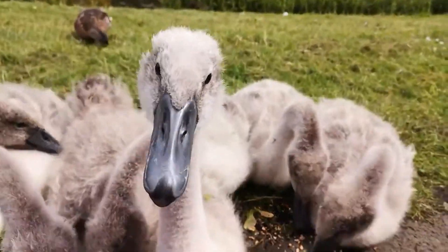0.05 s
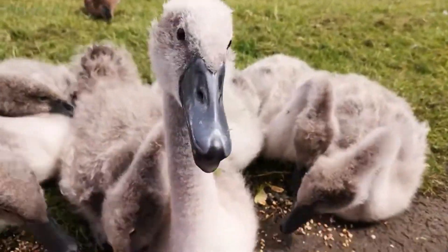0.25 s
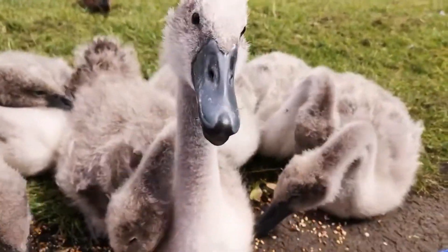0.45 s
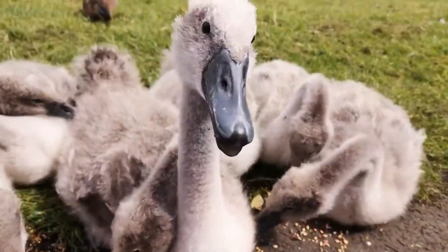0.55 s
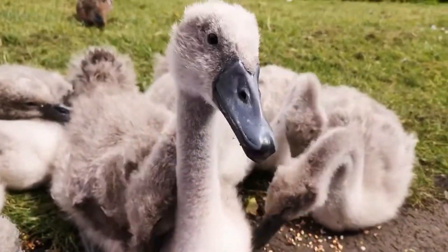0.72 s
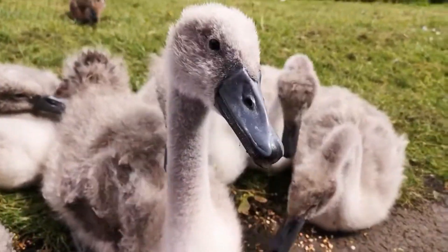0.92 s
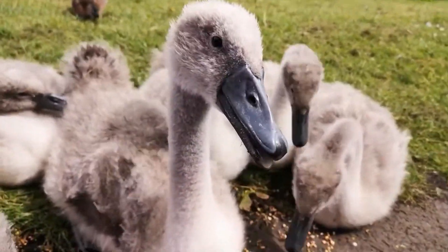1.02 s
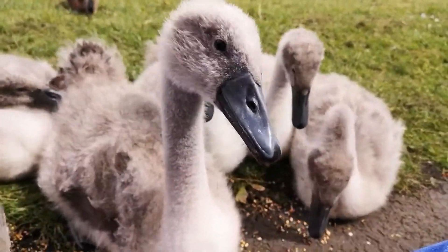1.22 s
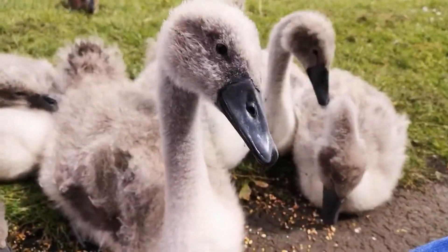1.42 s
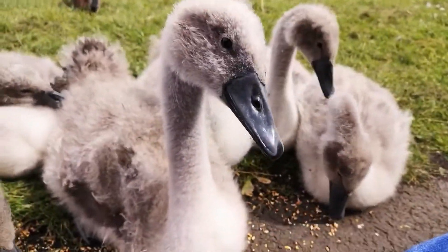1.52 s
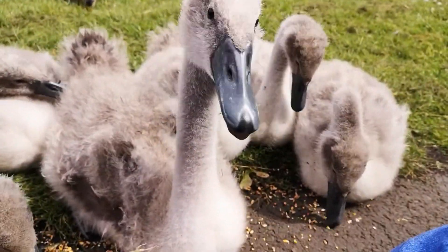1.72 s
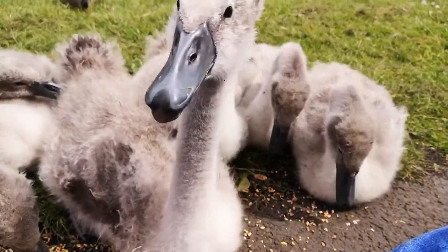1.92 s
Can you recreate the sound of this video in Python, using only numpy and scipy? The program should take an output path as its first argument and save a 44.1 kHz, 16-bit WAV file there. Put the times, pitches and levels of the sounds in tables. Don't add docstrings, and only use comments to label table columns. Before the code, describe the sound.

Cygnet peeps on an open lawn: after brief silence, a loud first whistle, then a second with a quick mid-note flutter and a third; distant siblings rasp and chirp over bill clicks, wind buffets and faint traffic.

```python
import sys
import numpy as np
from scipy import signal
from scipy.io import wavfile
from scipy.ndimage import uniform_filter1d

SR = 44100
rng = np.random.default_rng(int(sys.argv[2]) if len(sys.argv) > 2 else 0)


def output_pcm(signal):
    pcm = np.clip(np.atleast_2d(signal).T, -1, 1) * 32767
    wavfile.write(sys.argv[1], SR, np.round(pcm).astype(np.int16))


def voltage_ratio(level):
    return 10 ** (np.asarray(level, float) / 20)


N = 85995
OPEN_S = .2038
WAVER = .0023


def rms_one(x):
    return x / np.sqrt(np.mean(x ** 2) + 1e-20)


def in_time(rows, smooth_s=.001):
    s, *columns = np.transpose(rows)
    t = np.arange(N) / SR
    return [uniform_filter1d(np.interp(t, s, c), size=int(smooth_s * SR) + 1) for c in columns]


def at_hz(points, hz):
    point_hz, value = np.transpose(points)
    return np.interp(np.log(hz), np.log(point_hz), value)


def drift(rate):
    r = np.exp(-2 * np.pi * rate / SR)
    return rms_one(signal.lfilter([1], [1, -2 * r, r * r], rng.standard_normal(N + SR))[SR:])


def gate(start, end, edge):
    t = np.arange(N) / SR
    return np.clip(np.minimum(t - start, end - t) / edge, 0, 1)


def band_pass(x, low_high_hz, order=2):
    return signal.sosfilt(signal.butter(order, low_high_hz, "band", fs=SR, output="sos"), x)


def bands(spectrum, likeness, patchy_db, together_rate, own_rate):
    out, together = 0, drift(together_rate)
    edges = 16 * 2 ** np.arange(0, 10.1, .5)
    white = rng.standard_normal((2, 2, N + SR // 4))
    for k, (low, high) in enumerate(zip(edges, edges[1:])):
        hz = np.sqrt(low * high)
        if not spectrum[0][0] <= hz <= spectrum[-1][0]:
            continue
        mid, side = band_pass(white[k % 2], [low, high])[:, -N:]
        alike = np.clip(at_hz(likeness, hz), -1, 1)
        flicker_db = patchy_db * (together + .46 * drift(own_rate))
        gain = voltage_ratio(at_hz(spectrum, hz) + flicker_db)
        out = out + gain * (np.sqrt(1 + alike) * mid + np.sqrt(1 - alike) * side * [[1], [-1]])
    return rms_one(out)


def far_air():
    # f/Hz, level/dB per Hz
    air_spectrum = [(59, -4), (100, -6), (239, -10.5), (277, -12), (433, -31.5), (513, -24.5),
                    (2860, -25.5), (14700, -84), (16000, -60)]
    # f/Hz, correlation
    air_likeness = [(60, .99), (290, .74), (640, -.3), (1400, .05), (15000, 0)]
    return voltage_ratio(-52) * bands(air_spectrum, air_likeness, patchy_db=1.5, together_rate=6.0, own_rate=25.0)


def wind():
    # t/s, level/dB
    gust_levels = [(0.21, -36.5), (0.34, -24.5), (0.378, -33.5), (0.412, -23), (0.562, -38.5),
                   (0.708, -27.5), (0.854, -40), (0.892, -29), (0.994, -27), (1.024, -41), (1.058, -25.5),
                   (1.11, -29.5), (1.126, -40), (1.226, -32), (1.318, -50), (1.454, -42), (1.77, -57),
                   (1.95, -40.5)]
    # f/Hz, level/dB per Hz
    wind_spectrum = [(12, 9), (20, 1), (85, -6.5), (151, -21), (348, -43), (500, -55), (650, -65),
                     (1100, -120)]
    # f/Hz, correlation
    wind_likeness = [(20, .99), (80, .985), (170, .92), (500, .5)]
    # t/s, level/dB
    buffets = [(0.203, -40.5), (.335, -48), (0.364, -49.5), (0.411, -52), (0.658, -49), (.702, -43.5),
               (0.811, -40.5), (.9, -56), (0.982, -50.5), (1.074, -44), (1.25, -49), (1.299, -49),
               (1.36, -44), (1.394, -46.5), (1.945, -45.5)]
    buffet_hz, buffet_s = (138, 389), .0098
    push_db, settle_s = -19, .01
    left_lag = 34

    t = np.arange(N) / SR
    noise = bands(wind_spectrum, wind_likeness, patchy_db=1.5, together_rate=14.0, own_rate=8.0)
    gusts = voltage_ratio(in_time(gust_levels, smooth_s=.02)[0]) * noise
    white = rng.standard_normal((3, N))
    dull = rms_one(band_pass(white[0] + .5 * white[1:], buffet_hz))
    knocks = sum(voltage_ratio(db) * np.exp(-((t - s) / buffet_s) ** 2) for s, db in buffets)
    push = voltage_ratio(push_db) * np.exp(-np.abs(t - OPEN_S) / settle_s)
    left, right = gusts + dull * knocks - push
    return np.array([np.roll(left, left_lag), right])


def down_and_grass():
    # t/s, level/dB
    stir_levels = [(.2, -55), (.3, -54.5), (.35, -46.5), (.45, -54), (.6, -54.5), (.75, -47.5), (.9, -51.5),
                   (1.3, -51), (1.41, -49.5), (1.45, -54.5), (1.8, -59.5), (1.9, -52.5), (1.95, -48)]
    # f/Hz, level/dB per Hz
    rustle_spectrum = [(700, 7), (1000, 8.5), (2200, 10.5), (8000, -5.5), (15000, -20.5)]
    alike = [(500, .2), (15000, .2)]  # f/Hz, correlation
    noise = bands(rustle_spectrum, alike, patchy_db=2.0, together_rate=80.0, own_rate=40.0)
    return voltage_ratio(in_time(stir_levels)[0]) * noise


def bills():
    # t/s, level/dB, ring f/Hz, left minus right/dB
    ticks = [(0.227, -40.5, 10000, 5), (0.341, -46, 6170, -13), (0.5813, -40, 1670, 17),
             (0.589, -39, 1063, 0), (0.596, -40, 5910, -14), (0.6013, -35, 6700, -6),
             (0.6019, -28.5, 4700, -15), (.6095, -43, 6000, -8), (0.6572, -35, 4850, -9),
             (.7045, -40, 6000, -12), (0.7062, -28.5, 2020, -10), (0.734, -41, 4970, -11),
             (0.809, -30, 2140, -15), (1.014, -49, 5000, 1), (1.1, -40, 4500, -4), (1.297, -46, 4540, -2),
             (1.304, -39, 4150, 0), (1.352, -42, 6960, -9), (1.402, -39, 8000, -1), (1.417, -43, 6800, -11),
             (1.503, -46, 10100, -2), (1.851, -44, 8600, -12), (.278, -47, 5960, -3), (.319, -62, 5000, 2),
             (.346, -39.5, 5000, -5), (1.51, -49, 6000, -2), (1.842, -44, 3200, -4), (1.866, -49, 7000, 0),
             (1.918, -46, 5000, -6), (1.925, -46, 5500, -13), (1.934, -44, 5200, -7), (1.938, -39, 5600, 0),
             (1.943, -46, 5000, -2), (1.947, -43, 5500, 4) ]
    ring_cycles, crack_s, rise_s, crack_db = 7, .0011, .0003, -1.5
    length = 800
    out, t = np.zeros((2, N + length)), np.arange(length) / SR
    for (s, db, hz, pan_db), noise in zip(ticks, rng.standard_normal((len(ticks), 3, length))):
        scratch = (noise[0] + .5 * noise[1:]) * np.exp(-t / crack_s)
        crack = band_pass(scratch, [.7 * hz, min(2.2 * hz, 12500)])
        ring = np.sin(2 * np.pi * hz * t) * voltage_ratio(-60 * t * hz / ring_cycles / 2)
        tick = (ring + voltage_ratio(crack_db) * crack) * (1 - np.exp(-t / rise_s))
        start = int(s * SR)
        out[:, start:start + length] += voltage_ratio(db) * tick * voltage_ratio([[pan_db / 2], [-pan_db / 2]])
    return out[:, :N]


def siblings():
    # t/s, length/s, crest f/Hz, level/dB, left minus right/dB
    clear_peeps = [
        (.352, .024, 2300, -30, -4),
        (.568, .062, 2370, -44, -1),
        (.65, .045, 2050, -55, -4),
        (.763, .1, 2590, -40, 5),
        (1.012, .08, 2430, -44, 0),
        (1.245, .088, 2280, -45, 3),
    ]
    hoarse_peeps = [
        (.325, 0.085, 2177, -35.5, -6),
        (1.081, 0.073, 2125, -31.5, -2.5),
        (1.295, .096, 2132, -32, -3.5),
    ]
    clear_second_db = [-12, -24, -26, 1, -17, -26]
    throb_crests = [0.327, .338, .351, .364, 0.376, 0.391, 0.407, 1.08, 1.092, 1.1, 1.11, 1.115, 1.126,
                    1.139, 1.15, 1.165, 1.295, 1.302, 1.31, 1.322, 1.327, 1.339, 1.351, 1.368, 1.387, 1.4]
    echo_lags = [(.0031, .0098), (.0054, .0077)]
    echo_db = -8
    fall_s, edge_s, fall_sag = .025, .012, .15
    rasp_depth, rasp_noise = .7, .25

    t, out = np.arange(N) / SR, np.zeros((2, N))
    hiss = rms_one(band_pass(rng.standard_normal(N), (4230, 4480)))
    # rise sag, second partial/dB, rasp
    kinds = [(.21, db, .3) for db in clear_second_db] + [(.08, -26, 1)] * len(hoarse_peeps)
    for (s, length, hz, db, pan_db), (rise_sag, second_db, rasp) in zip(clear_peeps + hoarse_peeps, kinds):
        hoarse = rasp == 1
        crest = s + length - fall_s
        rise = rise_sag * np.abs((crest - t) / (crest - s)) ** 1.6
        fall = fall_sag * ((t - crest) / fall_s) ** 2
        droop = np.where(t < crest, rise, fall)
        sag = np.clip(droop, 0, .5)
        waver = 1 + WAVER * (3 + 5 * rasp) * drift(76.0)
        turns = np.cumsum(hz * (1 - sag) * waver) / SR

        throb = rasp_depth * np.cos(2 * np.pi * np.interp(t, throb_crests, np.arange(len(throb_crests))))
        throb = 1 + rasp * (throb + rasp_noise * np.array([drift(120), drift(140)]))
        second = hiss if hoarse else np.sin(4 * np.pi * turns)
        tone = np.sin(2 * np.pi * turns) + voltage_ratio(second_db - 150 * droop) * second
        level_db = db + hoarse * .5 * (t - s) / length - 8 * sag * (t > crest)
        voice = voltage_ratio(level_db) * gate(s, s + length, edge_s) * throb * tone
        out += voice * voltage_ratio([[min(pan_db, 0)], [min(-pan_db, 0)]])
    echoes = [sum(np.roll(x, int(s * SR)) for s in lags) for x, lags in zip(out, echo_lags)]
    return out + voltage_ratio(echo_db) * np.array(echoes)


def near_bird():
    # t/s, pitch f/Hz, level/dB, second partial/dB, third partial/dB
    peep_a = [(.369, 2200, -37, -51, -40), (0.376, 2437, -9, -50, -42.5), (0.387, 2604, -14, -26.5, -53),
              (0.412, 2696, -12.5, -21, -47), (0.457, 2634, -13, -28.5, -43),
              (0.492, 2684, -11.5, -29, -39), (0.526, 2633, -13, -39.5, -36.5),
              (0.558, 2443, -19, -37.5, -48.5), (0.576, 1930, -36.5, -49, -70)]
    peep_b = [(.751, 2520, -24, -60, -62), (.757, 2510, -16, -58, -57), (.774, 2710, -16, -36, -50),
              (.788, 2805, -19, -27, -41), (.82, 2770, -17.5, -22, -27), (.868, 2795, -17.5, -28, -29),
              (.88, 2780, -15, -32, -33), (.904, 2700, -14, -34, -44), (.92, 2540, -18, -47, -62),
              (.937, 2100, -42, -56, -75)]
    peep_c = [(1.113, 2490, -17, -63, -63), (1.125, 2500, -35, -59, -57), (1.144, 2750, -23.5, -31, -52),
              (1.168, 2740, -18, -29, -62), (1.201, 2794, -18.5, -28.5, -43),
              (1.249, 2730, -15, -37, -55.5), (1.273, 2638, -19.5, -39.5, -44.5),
              (1.285, 2530, -19.5, -44, -68), (1.297, 2190, -32, -83, -75)]
    shadow_db = [
        (-6, -13, -18.5, -7, -9),
        (-2, -14.5, -13, -16, -13),
        (1.5, -7.5, -4, 4, -7),
    ]
    left_leads = [(.51, 0, .55, .35, .2), (.49, .53, .04, .3, 0), (.44, .65, .23, .3, .5)]
    upper_db = [(-12, 0, -24, -16), (-24, -24, -30, -32), (-30, -28, -24, -24)]
    slip_times = [
        .796,
        .8115,
        .8295,
        .848,
        .87,
        .876,
    ]
    other_half = [.75, 1.3, 1.7, 1.6, 1.6]
    breath_levels = [-45, -49, -64]
    slip_skew, slip_pull = .6, .6
    port_lag_s, lead_at_hz = .00018, 2740

    t, out = np.arange(N) / SR, np.zeros((2, N))
    steps = np.interp(t, slip_times, [-.5, 0, 1, 2, 3, 3.5])
    slip = .5 + steps + slip_skew * np.sin(2 * np.pi * steps) / (2 * np.pi)
    slip = uniform_filter1d(slip, size=90)
    hiss = band_pass(rng.standard_normal((2, N)), (4000, 10000), order=4)
    peeps = zip([peep_a, peep_b, peep_c], shadow_db, left_leads, upper_db, breath_levels)
    for rows, shadows, leads, upper, breath_db in peeps:
        start, end = rows[0][0], rows[-1][0]
        hz, first, second, third = in_time(rows, smooth_s=.008)
        turns = np.cumsum(hz * (1 + WAVER * drift(60))) / SR + slip_pull * (slip - steps)
        late = np.clip((t - start) / (end - start), 0, 1)
        sounding = gate(start, end, .00056)
        fourth = third + upper[0] + late * (upper[1] - upper[0])
        fifth = third + upper[2] + late * (upper[3] - upper[2])
        for k, level in enumerate([first, second, third, fourth, fifth]):
            partial = 2j * np.pi * (k + 1)
            both = (1 + other_half[k] * np.exp(partial * slip)) / (1 + other_half[k])
            tone = voltage_ratio(level) * sounding * both * np.exp(partial * turns)
            lead = leads[k] + (k + 1) * port_lag_s * (lead_at_hz - hz)
            out[0] += voltage_ratio(shadows[k]) * np.imag(tone * np.exp(2j * np.pi * lead))
            out[1] += np.imag(tone)
        breath = voltage_ratio(breath_db + .58 * (second + 30) + 2.0 * drift(87))
        out += breath * sounding * hiss * voltage_ratio([[-5], [0]])
    return out


def scene():
    return far_air() + wind() + down_and_grass() + bills() + siblings() + near_bird()


def masked(dry):
    # low f/Hz, high f/Hz; threshold level/dB
    masked_bands = [(3050, 3750, 2500, 2950, -25), (540, 800, 2550, 2800, -18),
                    (9700, 10500, 8200, 8900, -40), (11700, 12900, 5200, 5900, -36),
                    (6300, 6900, 2760, 2820, -22)]

    def band(low, high):
        return signal.sosfiltfilt(signal.butter(4, [low, high], "band", fs=SR, output="sos"), dry)
    lost = 0
    for low, high, near_low, near_high, db in masked_bands:
        whistle = uniform_filter1d(np.mean(band(near_low, near_high) ** 2, axis=0), size=1400)
        lost = lost + np.clip(whistle / voltage_ratio(2 * db), 0, 1) ** 2 * band(low, high)
    return lost


def roll_off(x):
    return signal.sosfilt(signal.butter(12, 16450, fs=SR, output="sos"), x)


def record(dry):
    top_cut = signal.cheby2(10, 60, 16400, fs=SR, output="sos")
    cut = signal.sosfilt(top_cut, dry - masked(dry))
    mix = cut * gate(OPEN_S, 9, .0004) ** 2
    return roll_off(mix)


dry = scene()
out = record(dry)
output_pcm(out)
```